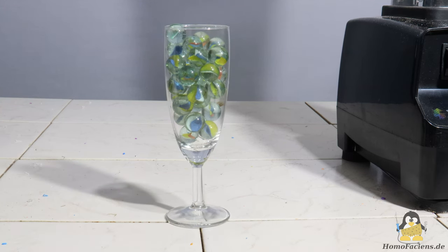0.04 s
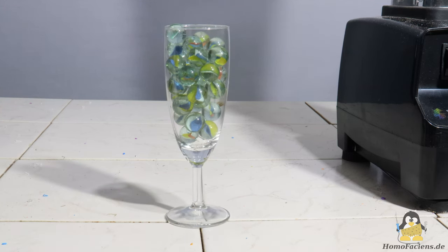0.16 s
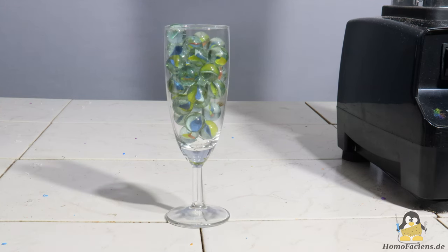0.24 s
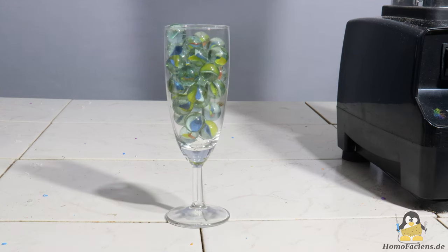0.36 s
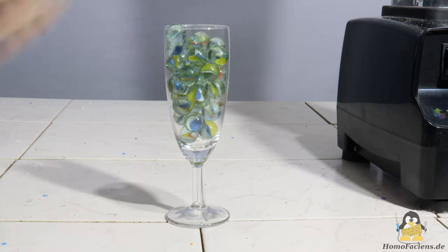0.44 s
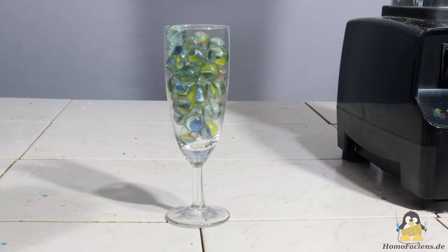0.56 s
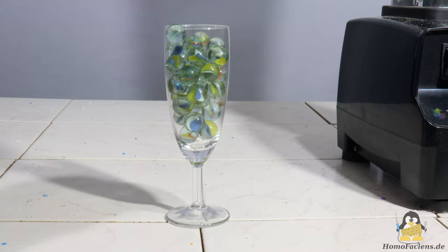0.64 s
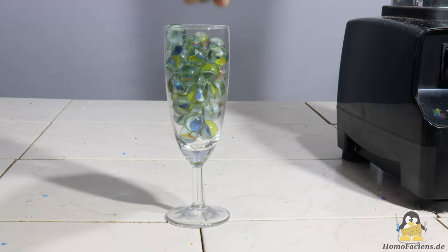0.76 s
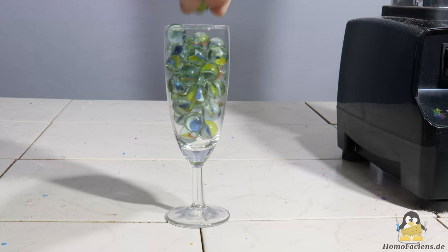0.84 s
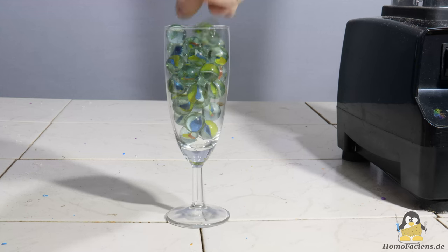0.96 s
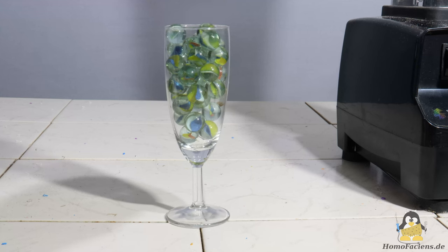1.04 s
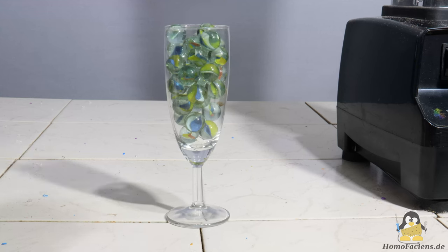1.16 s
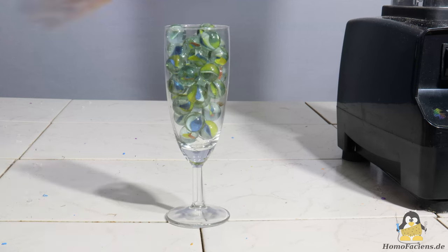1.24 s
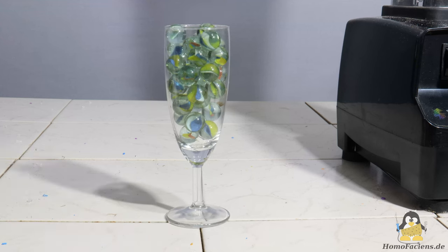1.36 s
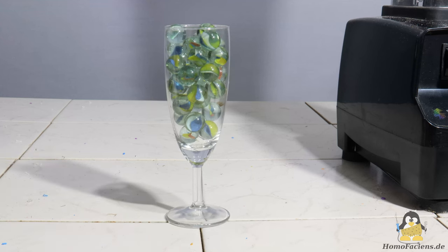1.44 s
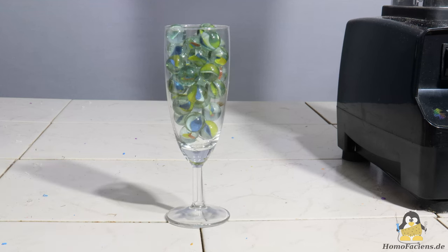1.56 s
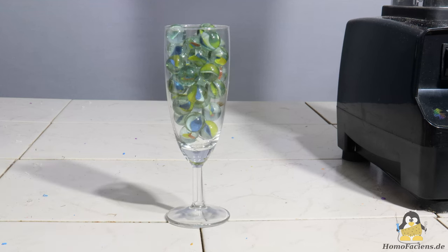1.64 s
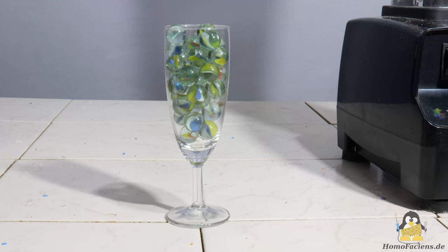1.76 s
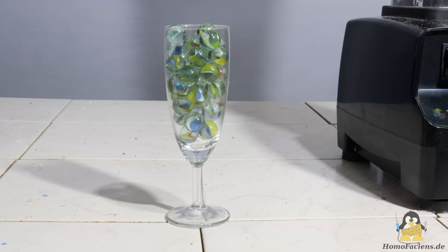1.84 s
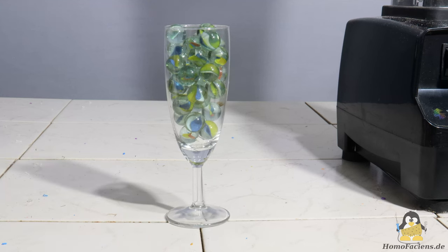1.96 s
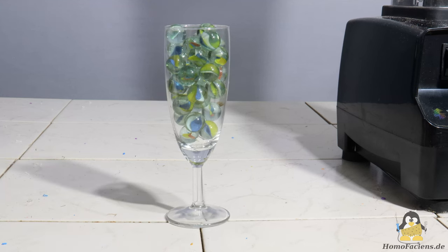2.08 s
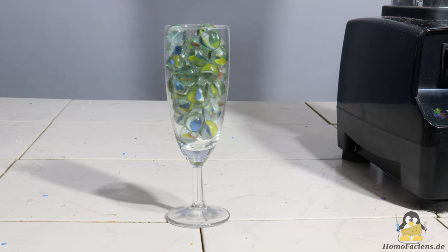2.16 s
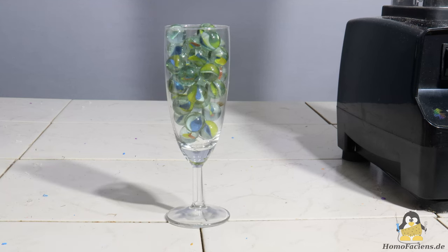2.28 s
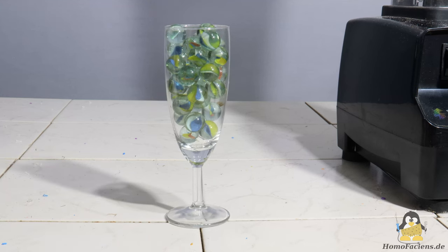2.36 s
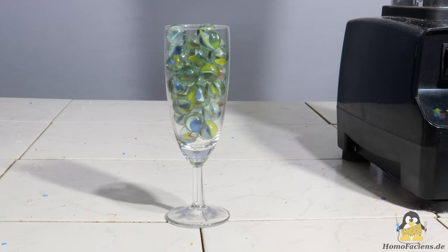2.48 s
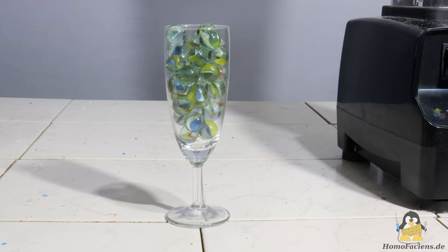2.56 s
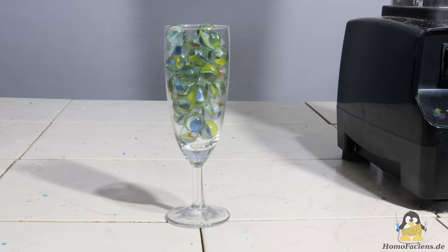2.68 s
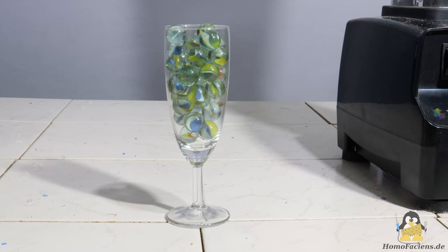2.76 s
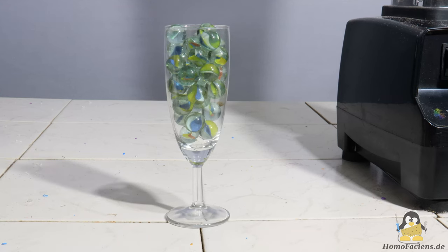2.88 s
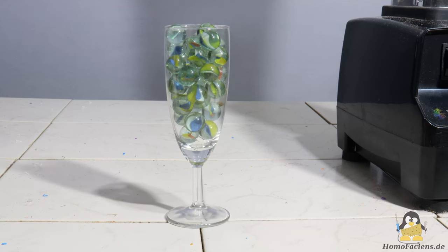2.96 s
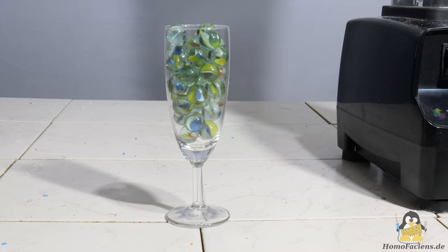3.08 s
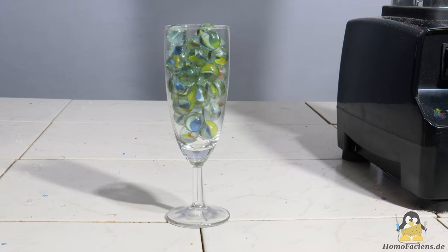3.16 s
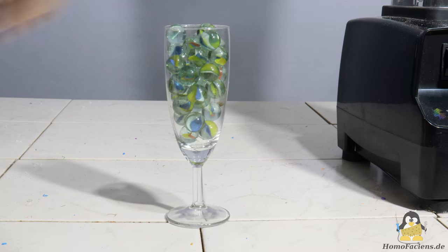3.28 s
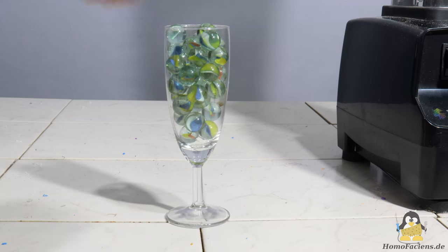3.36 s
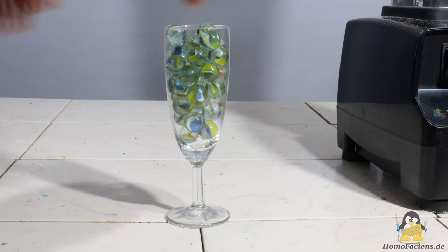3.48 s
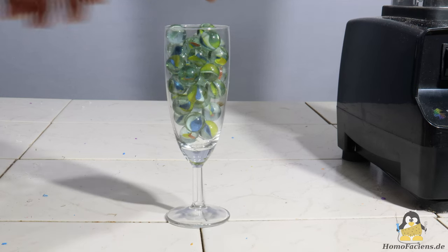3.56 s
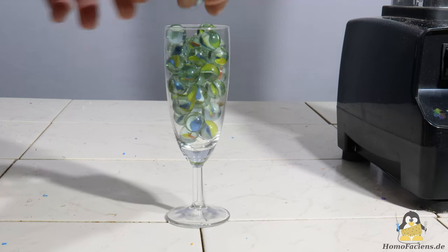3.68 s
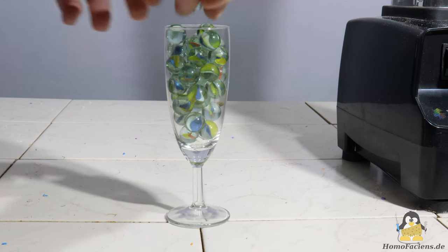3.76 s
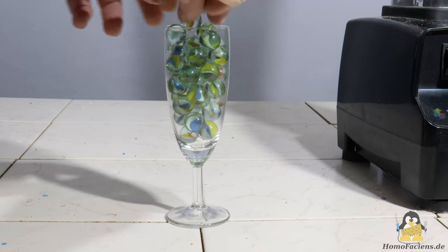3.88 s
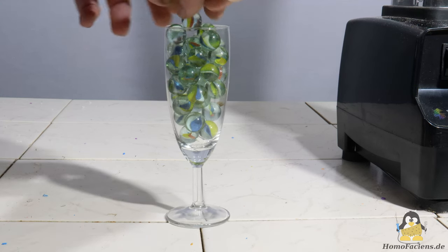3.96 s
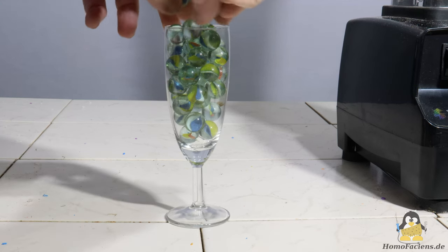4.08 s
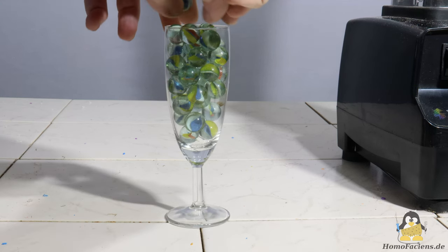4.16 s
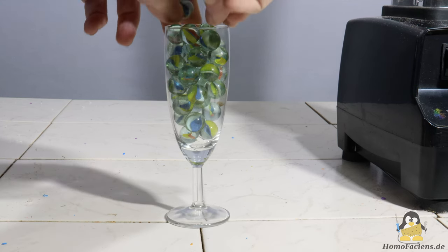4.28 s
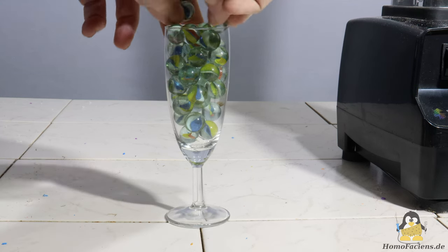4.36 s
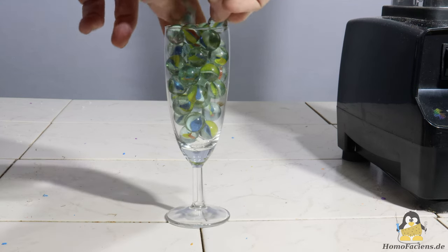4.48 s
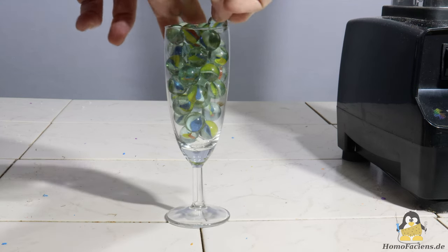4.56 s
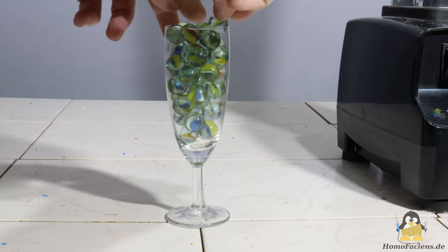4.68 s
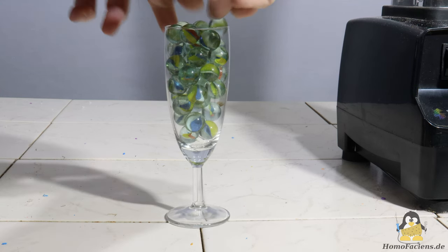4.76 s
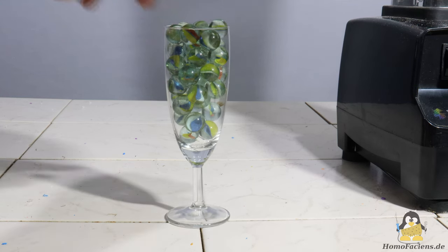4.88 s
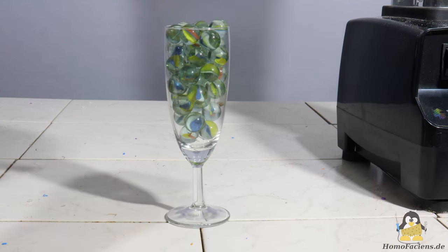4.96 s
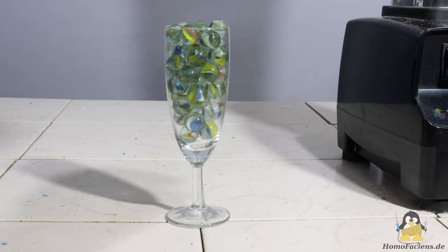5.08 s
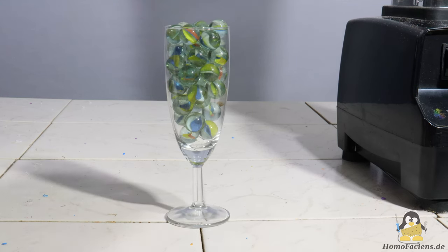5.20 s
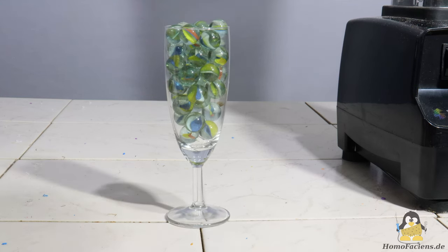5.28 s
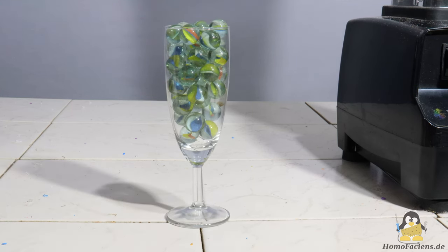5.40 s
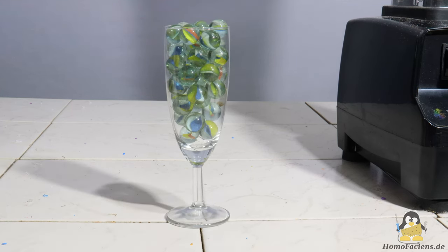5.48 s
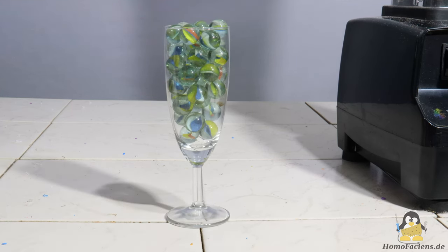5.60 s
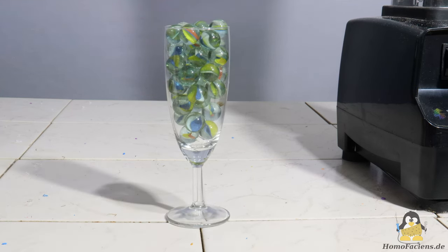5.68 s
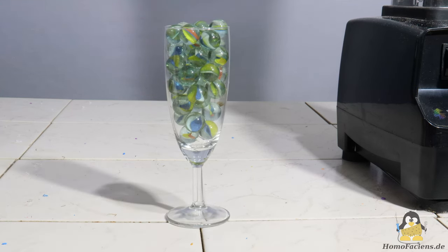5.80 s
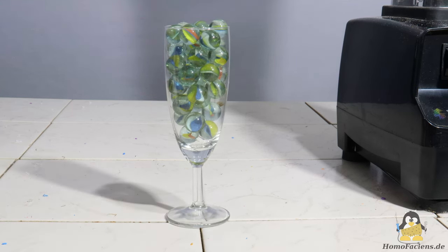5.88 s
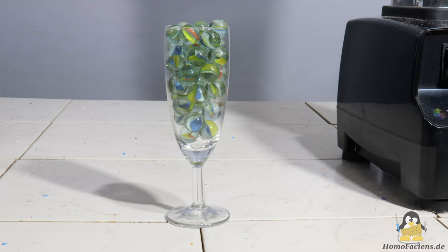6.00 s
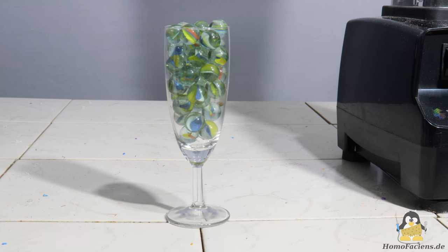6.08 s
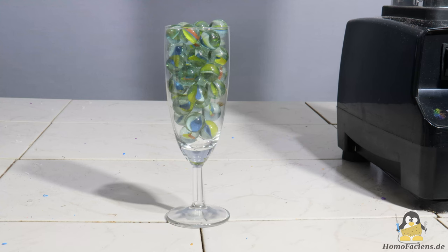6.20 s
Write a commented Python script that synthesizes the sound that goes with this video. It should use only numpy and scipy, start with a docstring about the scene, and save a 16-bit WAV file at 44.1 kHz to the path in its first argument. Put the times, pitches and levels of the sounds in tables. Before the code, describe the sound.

A hand rummages in a thin plastic bag off to the left, crinkling it while marbles knock inside. One marble drops into a glass already full of them with a short, damped clink. The rustling resumes, then gives way to a soft sleeve rub, and a handful of marbles clicks, grinds and settles in the glass. A motor hums faintly throughout in the small room.

```python
"""Glass marbles are dropped onto a stemmed glass already full of them, on a tiled table in a small room.
A motor hums faintly throughout. Off to the left a hand rummages in what is likely a thin plastic bag,
which crinkles while marbles knock inside. At 1 s one marble falls onto the glass; the packed marbles
damp it to a short clink. After 3 s the rummaging gives way to a soft rub, likely a sleeve, and from
about 4 s a handful of marbles falls, grinds and settles, until only the motor and the air remain."""
import sys
import numpy as np
from scipy import signal
from scipy.fft import rfft, irfft
from scipy.io import wavfile
from scipy.ndimage import uniform_filter1d

SR = 44100
rng = np.random.default_rng(int(sys.argv[2]) if len(sys.argv) > 2 else 0)


def output_pcm(signal):
    """Save a mono or channel-first signal as 16-bit PCM at the path in sys.argv[1].

    Samples are clipped to [-1, 1] before scaling.
    """
    pcm = np.clip(np.atleast_2d(signal).T, -1, 1) * 32767
    wavfile.write(sys.argv[1], SR, np.round(pcm).astype(np.int16))


N = 275163

# how hard the hand stirs in the bag: (time [s], effort [dB])
STIR_EFFORT = [(0, -42), (0.1, -45.5), (0.31, -44), (0.38, -54), (0.78, -58), (0.96, -60), (1.02, -50),
               (1.15, -52), (1.21, -61.5), (1.36, -62.5), (1.41, -54), (1.52, -45.5), (1.575, -48.5),
               (1.66, -44), (1.85, -47.5), (2.05, -47.5), (2.48, -46), (2.54, -56), (2.62, -47.5),
               (3.08, -51), (3.12, -71.5), (3.8, -74.5)]


def amp(db):
    """Decibels to gain."""
    return 10 ** (np.asarray(db) / 20)


def unit(x):
    """Scales to rms 1."""
    return x / np.sqrt(np.mean(x ** 2) + 1e-20)


def curve_at(points, hz):
    """Reads a curve on a log-frequency axis."""
    freqs, values = np.transpose(points)
    return np.interp(np.log(hz + 1), np.log(freqs + 1), values)


def fader(points):
    """Gain envelope through (time [s], level [dB]) points, silent outside them."""
    return amp(np.interp(np.arange(N) / SR, *np.transpose(points), left=-np.inf, right=-np.inf))


def add(mix, start_s, sound):
    """Lays a sound into the mix."""
    part = mix[..., max(round(start_s * SR), 0):][..., :sound.shape[-1]]
    part += sound[..., :part.shape[-1]]


def convolve(x, taps):
    """Passes rows of sound through rows of taps."""
    return signal.oaconvolve(np.atleast_2d(x), np.atleast_2d(taps), axes=1)[:, :N]


def equalise(x, points, size=2048):
    """Minimum-phase EQ along a dB curve, so that attacks stay sharp."""
    log_gain = np.log(amp(curve_at(points, abs(np.fft.fftfreq(size, 1 / SR)))))
    response = np.exp(np.conj(signal.hilbert(log_gain)))
    return convolve(x, np.fft.ifft(response).real)


def split(x, corner_hz):
    """Crossover into lows and highs, whose sum has a flat spectrum."""
    return [signal.sosfilt(signal.butter(3, corner_hz, kind, fs=SR, output="sos"), x)
            for kind in ("low", "high")]


def resonate(x, hz, q):
    """One resonant band-pass."""
    return signal.lfilter(*signal.iirpeak(hz, q, SR), x)


def stereo(left, other, likeness):
    """Blends two independent noises into a pair with the given correlation."""
    return np.array([left, likeness * left + np.sqrt(1 - likeness ** 2) * other])


def mono_bass(x):
    """Long waves reach both sides alike: both get the left side's lows."""
    low, high = split(x, corner_hz=520)
    return low[0] + high


def wander(top_hz):
    """Smooth random modulation of rms 1."""
    t = np.arange(0, N + 128, 128) / SR
    drift = sum(np.sin(2 * np.pi * (hz * t + rng.random())) for hz in np.geomspace(top_hz / 10, top_hz, 24))
    return unit(np.interp(np.arange(N) / SR, t, drift))


def bursts(events, t60, likeness, pitch_db, pitch_q, crack=0, crack_t60=0.005):
    """Each contact is a tight, fast-dying swarm of tiny impacts, with an optional first crack."""
    t, out = np.arange(1500) / SR, np.zeros((2, N))
    envelope = amp(-60 * t / t60) + crack * amp(-60 * t / crack_t60)
    for start_s, db, treble_db, *pitch_hz in events:
        swarm = stereo(*(rng.standard_normal((2, len(t))) * envelope), likeness)
        low, high = split(swarm / np.linalg.norm(swarm, axis=1, keepdims=True), corner_hz=5000)
        burst = low + amp(treble_db) * high  # the shorter a contact, the more treble it has
        if pitch_hz:
            burst += (amp(pitch_db) - 1) * resonate(burst, pitch_hz[0], pitch_q)
        add(out, start_s, amp(db) * burst)
    return out


def air(level_db=-71):
    """Soft, steady room tone, most alike on both sides in the midrange."""
    # colour of the air noise: (frequency [Hz], relative level [dB])
    air_eq = [(30, -12), (80, -8), (160, -2), (400, -4.5), (1000, -9), (1500, -8), (2200, -10), (4500, -16),
              (9000, -20), (15500, -19)]
    # likeness of left and right: (frequency [Hz], correlation [0-1])
    likeness = [(60, 0.097), (300, 0.44), (1000, 0.86), (3000, 0)]
    hz = np.fft.rfftfreq(N, 1 / SR)
    spectra = stereo(*rfft(rng.standard_normal((2, N))), curve_at(likeness, hz))
    return amp(level_db) * unit(irfft(spectra * amp(curve_at(air_eq, hz)), N))


def motor(shaft_hz=24.57, hum_db=-2, whir_left_db=-5, whir_right_db=3, flutter=0.14, waver=0.00048):
    """Multiples of one shaft rate hum over a whir in the housing; the whole sound flutters."""
    # tones of the motor: (multiple of the shaft rate, relative level [dB], left minus right [dB])
    shaft_tones = [(7, -81, -3), (8, -81, -6), (10, -85, -9), (25, -78, -14), (26, -82, -11),
                   (30, -80, -10), (31, -79, -10), (32, -79, 1), (33, -69, -8), (34, -70, -17),
                   (48, -73, -5), (49, -75, -8), (51, -88, -5), (55, -84, 7), (130, -81, -10),
                   (131, -82, -10)]
    # resonances of its housing: (frequency [Hz], width of each filter pass [Hz], relative level [dB])
    housing_modes = [(194, 21, -82.5), (613.5, 80, -71.5), (768, 35, -78), (851, 56, -76.5),
                     (950, 35, -86.5), (1166, 60, -76), (1480, 270, -79.5), (3230, 85, -80.5)]
    turns = np.cumsum(shaft_hz * (1 + waver * wander(6.2))) / SR
    hum, whir = np.zeros((2, 2, N))
    for multiple, db, pan_db in shaft_tones:
        pan = unit(amp([[pan_db / 2], [-pan_db / 2]]))
        hum += np.sqrt(2) * amp(db) * pan * np.cos(2 * np.pi * (multiple * turns + rng.random()))
    for hz, width_hz, db in housing_modes:
        band = resonate(rng.standard_normal((2, N)), hz, hz / width_hz)
        whir += amp(db) * unit(resonate(band, hz, hz / width_hz))
    whir *= amp([[whir_left_db], [whir_right_db]])
    return (amp(hum_db) * hum + whir) * (1 + flutter * wander(30))


def room(x, predelay_s=0.0032, build_s=0.0047, echoes_per_s=5000, patterns=3):
    """Dense reflections, each band dying at its own speed; their pattern shifts as hands and sources move."""
    # reverb time of the small room: (frequency [Hz], t60 [s])
    decay_times = [(150, 0.42), (1000, 0.4), (1900, 0.28), (3000, 0.2), (7000, 0.21), (15000, 0.12)]
    t = np.arange(SR // 2) / SR
    shape = (patterns, 2, len(t))
    echoes = rng.standard_normal(shape) * (rng.random(shape) < echoes_per_s / SR)
    onset = np.clip((t - predelay_s) / build_s, 0, 1)
    hz, age_s, spectra = signal.stft(echoes * onset, SR, nperseg=256)
    decay = amp(-60 * age_s / curve_at(decay_times, hz)[:, None])
    tails = signal.istft(spectra * decay, SR, nperseg=256)[1]
    tails /= np.linalg.norm(tails, axis=2, keepdims=True)
    sends = np.array([wander(6) for _ in tails])
    sends /= np.linalg.norm(sends, axis=0)
    return sum(convolve(x * send, tail) for send, tail in zip(sends, tails))


def sleeve(centre_hz=345, width_hz=90):
    """A soft low rubbing, likely a sleeve, as the arm reaches over to the glass."""
    # swell of the rub: (time [s], level [dB])
    swell = [(3.1, -84), (3.3, -71), (3.8, -74), (3.95, -82)]
    rub = resonate(rng.standard_normal((2, N)), centre_hz, centre_hz / width_hz)
    return unit(rub) * fader(swell)


def handling(attack_s=0.016, release_s=0.011, firm_db=-42.5, fizz_db_per_db=0.38):
    """Envelopes of rustle and fizz: the hand stirs and squeezes, and more effort sounds brighter."""
    # fingers squeeze a fold of the bag: (time [s], length [s], effort [dB], extra fizz [dB])
    squeezes = [(0.0, 0.008, -41, -7), (0.232, 0.08, -52, 10.5), (0.417, 0.062, -45, 1.5),
                (0.544, 0.05, -45.5, 2.5), (0.664, 0.071, -55.5, 7), (0.811, 0.078, -46.5, -0.5),
                (1.616, 0.055, -47, 4), (1.751, 0.029, -44.5, -1), (2.211, 0.064, -47.5, 0.5),
                (2.736, 0.065, -46, 3.5), (2.929, 0.097, -50.5, 8), (3.053, 0.024, -49, -2),
                (3.149, 0.067, -53.5, 6), (3.24, 0.017, -47, -1)]
    t = np.arange(N) / SR
    rustle_power, fizz_power = np.tile(fader(STIR_EFFORT) ** 2, (2, 1))
    for start_s, length_s, db, extra_db in squeezes:
        build = np.clip((t - start_s) / attack_s, 0, 1)
        relax = np.exp(-np.maximum(t - start_s - length_s, 0) / release_s)
        grip = amp(db) * build * relax
        rustle_power += grip ** 2
        fizz_power += (amp(extra_db) * grip) ** 2
    rustle, fizz = np.sqrt([rustle_power, fizz_power])
    return rustle, fizz * (rustle / amp(firm_db)) ** fizz_db_per_db


def stir_moments(count, until_s=3.1):
    """Random moments of the stirring: (time [s], effort [dB], size [-1.2 to 1], tone [-1.2 to 1])."""
    jitter, size, tone = rng.uniform(-1.2, 1, (count, 3)).T
    times = (np.arange(count) + (1 + jitter) / 2) / count * until_s
    return zip(times, np.interp(times, *np.transpose(STIR_EFFORT)), size, tone)


def crumple(creases_per_s=4000, size_db=3.1, rub=0.39, surge_db=2, fold_db=2.06, chafe_db=1.5):
    """Thousands of tiny creases flip in surges while film rubs on film and marbles chafe inside."""
    rustle, fizz = handling()
    sizes = amp(size_db * np.minimum(rng.exponential(1, N), 4.5))
    creases = unit(sizes * (rng.random(N) < creases_per_s / SR))
    left, other = creases * rng.choice([-1, 1], (2, N)) + rub * rng.standard_normal((2, N))
    right = np.where(rng.random(N) < 0.59, left, other)  # only some creases face both sides alike
    spectra = signal.stft(np.array([left, right]) * amp(surge_db * wander(140)), nperseg=256)[2]
    wide, narrow = uniform_filter1d(rng.standard_normal(spectra.shape), size=16, axis=2)
    folds = unit(uniform_filter1d(wide, size=12, axis=0))  # each fold has its own broad colour
    chafes = unit(uniform_filter1d(narrow, size=2, axis=0))  # brief narrow resonances
    spectra *= amp(fold_db * folds + chafe_db * chafes)
    grains = unit(signal.istft(spectra, nperseg=256)[1][:, :N])
    low, high = split(grains, corner_hz=4550)
    return amp(7) * rustle * low + amp(3.5) * fizz * high


def crease_snaps():
    """Creases of the bag snap over, the lesser ones as strongly as the hand stirs."""
    # the loudest creases: (time [s], relative level [dB], treble [dB], pitch [Hz])
    big_snaps = [(0.0267, -25.5, 4, 3400), (0.126, -27, 3, 4000), (0.1702, -15, -4, 12300),
                 (0.3542, -35, 11.5, 5600), (0.3761, -24, -6, 14600), (0.3971, -33.5, 9, 8000),
                 (0.4025, -22, 3, 2000), (0.4353, -28, 2, 10300), (0.5211, -25, 1, 4100),
                 (0.5263, -34, -8, 14500), (0.5525, -32, 13.5, 14500), (0.6279, -27.5, 3.5, 14500),
                 (0.6495, -27, 2, 5400), (0.6849, -27.5, 6, 14500), (0.7516, -29.5, 0.5, 9400),
                 (0.7979, -36, 8, 6060), (0.8359, -33.5, 11, 3100), (0.8429, -35, 12, 14500),
                 (0.8931, -18.5, 0, 6700), (0.9485, -35, 3.5, 7900), (1.2683, -45.5, 5.5, 9050),
                 (1.3127, -29, -11, 9400), (1.3445, -24, -17, 3400), (1.3512, -30.5, -2, 14500),
                 (1.409, -36, -3, 14500), (1.4668, -22.5, 3.5, 5800), (1.4842, -22, -12, 1990),
                 (1.5098, -27, -1, 3400), (1.6388, -25, 5, 11200), (1.6622, -19, -3, 12200),
                 (1.7002, -28, -3, 14500), (1.7292, -35, 0, 9000), (1.8698, -17, -9, 3460),
                 (1.9158, -18.5, 0, 10200), (1.926, -18, -4, 1970), (2.0308, -27, -1, 9400),
                 (2.2841, -24, -0.5, 2000), (2.3345, -27.5, 2.5, 14500), (2.4027, -22, 0.5, 2800),
                 (2.4566, -19.5, 2, 3700), (2.6235, -33, 4, 14500), (2.6813, -27, 5.5, 2000),
                 (2.7965, -17, -2, 2000), (2.8348, -26, 3, 13300), (2.8627, -30, -1, 4000),
                 (2.9646, -24.5, 0, 5560), (3.093, -22, -7, 7400), (3.2503, -32.5, 3, 2000),
                 (3.3623, -35.5, -4, 5170), (3.4131, -29.5, -16, 1980)]
    small_snaps = [(start_s, effort_db + 13 + 4.5 * size, 4 + 3 * tone)
                   for start_s, effort_db, size, tone in stir_moments(count=90)]
    return amp(9) * bursts(big_snaps + small_snaps, t60=0.0066, likeness=0.17, pitch_db=7, pitch_q=3.9)


def bag_clinks(gain_db=22, spread_db=3, centre_hz=2300, octaves=0.98, overtone=2.4, t60=0.028):
    """Stirred marbles touch lightly, each touch a brief pair of partials at a pitch of its own."""
    t, out = np.arange(SR // 10) / SR, np.zeros((2, N))
    for start_s, effort_db, size, tone in stir_moments(count=75):
        phase = 2 * np.pi * centre_hz * 2 ** (octaves * tone) * t
        ping = (np.sin(phase) + np.sin(overtone * phase)) * amp(-60 * t / t60)
        add(out, start_s, amp(effort_db + gain_db + spread_db * size) * ping / np.linalg.norm(ping))
    return out


def bag(body_db=-7, room_left_db=-10, room_right_db=-17, right_lag_s=0.0002):
    """Rustle, snaps and knocking marbles, off to the left and partly shaded from the right side."""
    # marbles knock together in the bag, and from 2.6 s the film crinkles in short clumps: (time [s], relative
    # level [dB], treble [dB], pitch [Hz])
    clack_hits = [(0.6804, -24, -10, 2300), (1.3851, -18.5, -5, 2040), (1.6218, -20.5, 2.5, 8100),
                  (1.6436, -19, -1.5, 4700), (1.8702, -21, -14, 3670), (2.4785, -15.5, 0, 4570),
                  (2.4836, -8, -26, 3200), (2.607, -23, -5, 2150), (2.675, -29, -5, 2200),
                  (2.743, -19.5, -12, 1100), (2.992, -21, -12, 970)]
    # faint glassy rings after each snap: (frequency [Hz], width [Hz], gain [dB])
    ting_modes = [(1702, 16, 9.5), (4500, 11, 3)]
    # colour of the bag: (frequency [Hz], gain [dB])
    film_eq = [(40, -32.5), (200, -11), (450, -11), (900, -0.5), (1250, 0), (1700, 2), (3000, 0),
               (4500, 1.5), (6500, 1.5), (11000, 1), (15500, -1)]
    # how the bag reaches the right side, with more bass and less treble: (frequency [Hz], gain [dB])
    shadow_eq = [(300, 13.5), (700, -10), (1300, -11), (4000, -6), (8000, -13.5), (15000, -16)]
    snaps = crease_snaps()
    clacks = amp(12) * bursts(clack_hits, t60=0.036, likeness=0.17, pitch_db=5, pitch_q=2.6)
    tings = sum(amp(db) * resonate(snaps, hz, hz / width_hz) for hz, width_hz, db in ting_modes)
    body, tick = split(snaps + clacks, corner_hz=1946)  # such small things radiate long waves poorly
    left, right = equalise(crumple() + bag_clinks() + tings + tick + amp(body_db) * body, film_eq)
    right = np.pad(right, (round(right_lag_s * SR), 0))[:N]
    direct = np.vstack([left, equalise(right, shadow_eq)])
    return direct + amp([[room_left_db], [room_right_db]]) * room(left)


def grind(slips_per_s=6000):
    """A marble grinds over its neighbours before it slips into place."""
    # swell of the grinding: (time [s], level [dB])
    swell = [(4.745, -73), (4.768, -57.5), (4.79, -63.5), (4.85, -62), (4.877, -49), (4.89, -83)]
    slips = rng.standard_normal(N) * (rng.random(N) < slips_per_s / SR)
    return unit(slips) * fader(swell)


def strikes(rebound_s=0.0073, knock_wall_db=-1):
    """Every contact in the glass: (time [s], level [dB], treble [dB], pitch [Hz], wall share [dB])."""
    # further single contacts in the glass, among them falls and rebounds at other gaps: (time [s], relative
    # level [dB], treble [dB], pitch [Hz])
    knocks = [(1.0446, -11, -0.5, 3500), (1.0624, -18.5, -1.5, 2550), (1.0696, -13.5, 1, 4300),
              (1.0735, -12, -0.5, 3730), (1.1467, -19.5, 0.5, 4200), (1.2147, -32.5, -5, 3500),
              (4.0283, -27.5, -6.5, 3700), (4.1559, -14.5, -6, 3350), (4.212, -26, -3.5, 3500),
              (4.2176, -8, -2, 3000), (4.467, -24.5, -10, 3700), (4.527, -32, -9, 3000),
              (4.5407, -34.5, -4.5, 5300), (4.62, -15, 3, 3900), (4.643, -20, 5.5, 2500),
              (4.8197, -21, -7, 3300), (4.8803, -14, -5, 4100), (4.8946, -30, -11, 3300),
              (4.9018, -25.5, -2.5, 3700)]
    # a falling marble strikes and rebounds once: (time [s], relative level [dB], treble [dB], pitch [Hz],
    # share into the glass wall [dB], rebound gain [dB], rebound extra treble [dB], rebound pitch [Hz])
    drops = [(1.0097, -7.5, 1.5, 3500, -0.5, -6.5, -1.5, 2500), (3.945, -8, -2, 3150, 6, -4.5, 4.5, 3700),
             (4.4156, -8.5, -3, 5260, 10.5, -4.5, -1, 2250),
             (4.609, -13.5, -2.5, 5910, -4, 9.5, -4.5, 3750)]
    hits = [(*knock, knock_wall_db) for knock in knocks]
    for start_s, db, treble_db, hz, wall_db, stronger_db, brighter_db, rebound_hz in drops:
        hits.append((start_s, db, treble_db, hz, wall_db))
        hits.append((start_s + rebound_s, db + stronger_db, treble_db + brighter_db, rebound_hz, wall_db))
    return hits


def ring(modes, spread_db, wall_follow, level_follow, any_side):
    """Every strike rings the modes, each more or less strongly by where it lands."""
    hz, db, t60 = np.transpose(modes)[:, :, None]
    t, out = np.arange(SR // 3) / SR, np.zeros((2, N))
    waves = np.exp(2j * np.pi * hz * t) * amp(-60 * t / t60)
    waves *= amp(db) / np.linalg.norm(waves.imag, axis=1, keepdims=True)
    for start_s, hit_db, _, _, wall_db in strikes():
        place, polarity, skew = rng.standard_normal((3, len(modes)))
        weight = amp(level_follow * hit_db + wall_follow * wall_db + spread_db * place)
        if any_side:
            weight *= np.sign(polarity)
        apart = np.exp(1j * skew * np.minimum(hz[:, 0] / 3000, 1))  # high modes reach the sides out of step
        add(out, start_s, (np.array([weight, weight * apart]) @ waves).imag)
    return out


def table_thump():
    """The table is struck only from above; even a soft contact carries the marble's weight."""
    # modes of the table under the glass's foot: (frequency [Hz], relative level [dB], t60 [s])
    table_modes = [(153.3, -27.5, 0.2), (182.4, -25, .2), (203.3, -27.5, 0.29), (227, -27.5, .12),
                   (298.6, -27, 0.24), (397, -27.5, 0.11), (445, -29.5, .16)]
    return amp(-2) * ring(table_modes, spread_db=2.5, wall_follow=0, level_follow=0.66, any_side=False)


def glass_clink():
    """The glass is struck from any side and rings briefly, damped by the packed marbles."""
    # modes of the filled glass: (frequency [Hz], relative level [dB], t60 [s])
    glass_modes = [(854, -21, 0.045), (980, -30.5, .08), (2120, -27, .045), (3260, -26, 0.01),
                   (3570, -20, 0.11), (3420, -25, 0.018), (3870, -26, .04), (5180, -22, 0.01),
                   (5380, -20, 0.02), (7500, -25, 0.025), (10120, -24.5, 0.02), (12450, -24, .03),
                   (14220, -20.5, .03), (15450, -20.5, .02)]
    return amp(-2.5) * ring(glass_modes, spread_db=4, wall_follow=0.77, level_follow=0.78, any_side=True)


def marble_clacks(grinding):
    """Glass hits and grinds on glass; each hit favours one broad band, set by the marbles that it meets."""
    # colour of a marble contact: (frequency [Hz], gain [dB])
    contact_eq = [(40, -32), (100, -28), (180, -21), (500, -18.5), (1500, -10), (2250, -0.5), (2700, -6.5),
                  (3400, -1), (4300, -4.5), (5200, -3), (7000, -1.5), (9500, -1), (11200, -3), (13000, -3),
                  (15500, -5)]
    clacks = bursts(strikes(), t60=0.03, likeness=0.34, pitch_db=7, pitch_q=4, crack=0.79)
    return equalise(amp(9) * clacks + grinding, contact_eq)


def falling_marbles(pan_db=2, thump_send_db=-1, room_db=-8.5, directions=3):
    """A blow runs through the packed marbles, rings the glass and thumps the table."""
    grinding = grind()
    clacks = [marble_clacks(grinding) for _ in range(directions)]  # the room hears several directions
    glass, thump = glass_clink(), table_thump()
    sends = [(clack + glass + amp(thump_send_db) * thump)[0] for clack in clacks]
    reverb = sum(room(send) for send in sends) / np.sqrt(directions)
    direct = (clacks[0] + glass) * amp([[pan_db], [-pan_db]]) + thump
    # little sounds below the table's lowest mode
    return split(direct + amp(room_db) * reverb, corner_hz=135)[1]


def scene():
    """Marbles, bag and sleeve in stereo over a bed of motor and air."""
    return mono_bass(falling_marbles() + bag() + sleeve()) + motor() + air()


def record(dry):
    """A steep low-pass trims the very top of the treble."""
    low_pass = signal.firwin(255, 16100, window=("kaiser", 9), fs=SR)
    return signal.oaconvolve(dry, low_pass[None], "same")


dry = scene()
out = record(dry)
output_pcm(out)
```